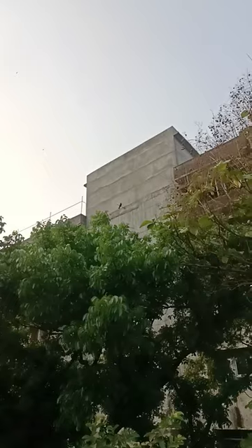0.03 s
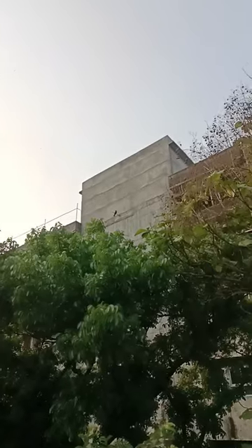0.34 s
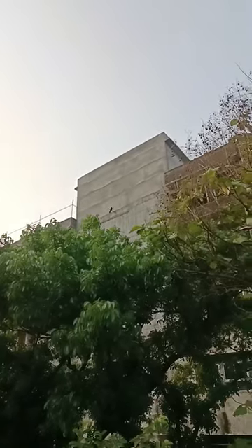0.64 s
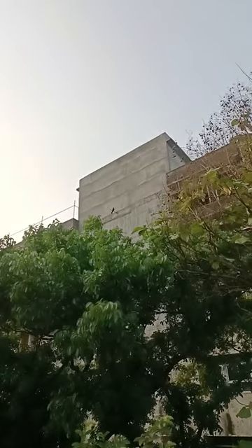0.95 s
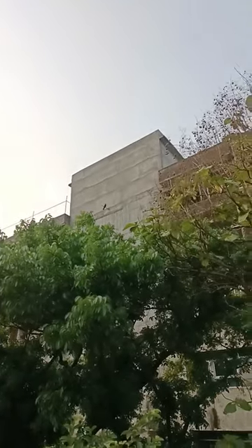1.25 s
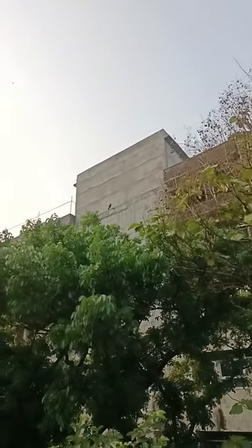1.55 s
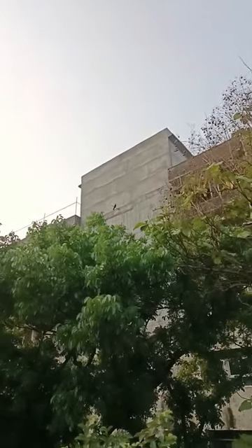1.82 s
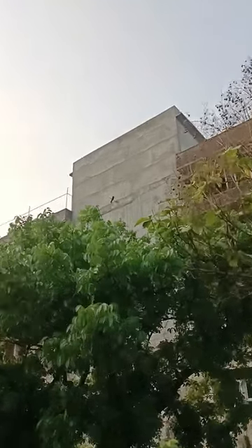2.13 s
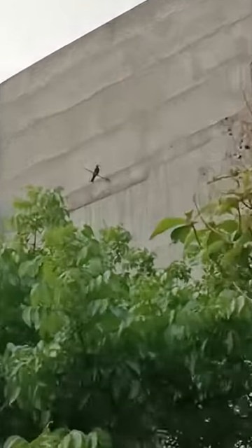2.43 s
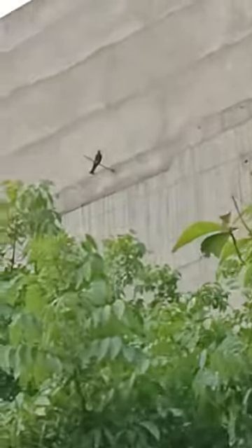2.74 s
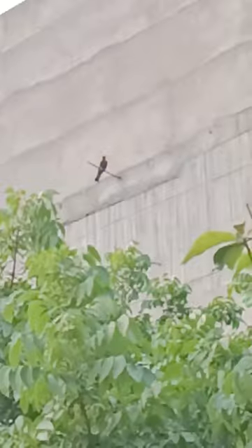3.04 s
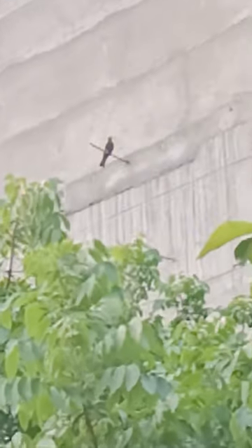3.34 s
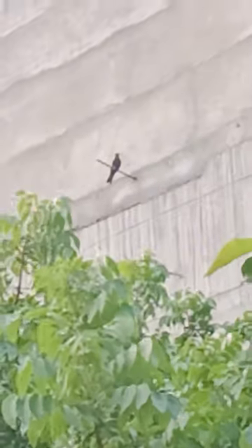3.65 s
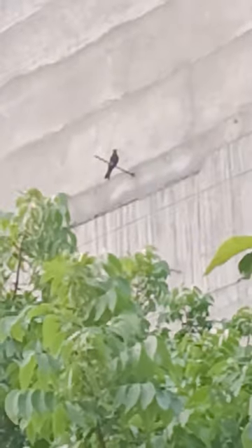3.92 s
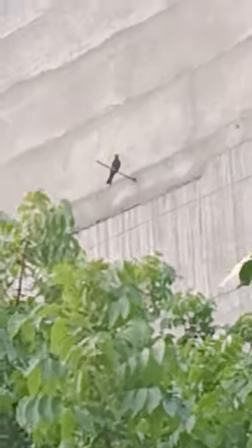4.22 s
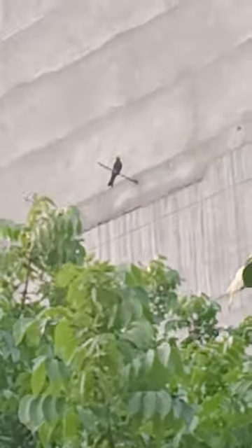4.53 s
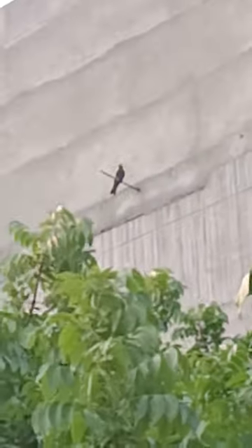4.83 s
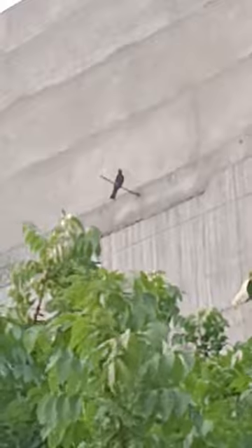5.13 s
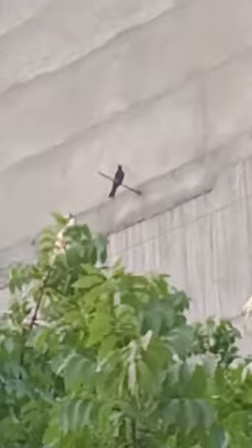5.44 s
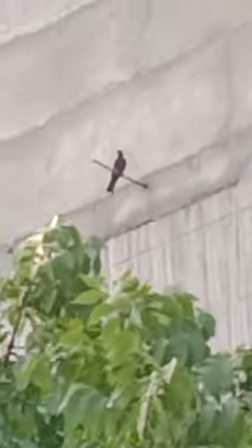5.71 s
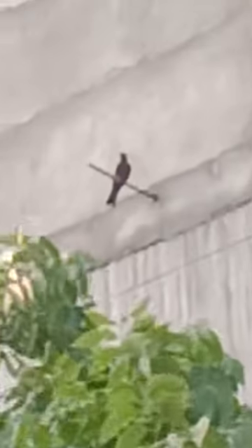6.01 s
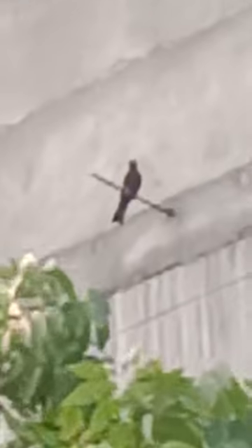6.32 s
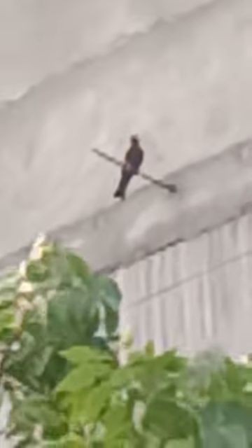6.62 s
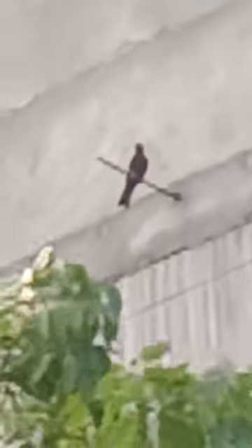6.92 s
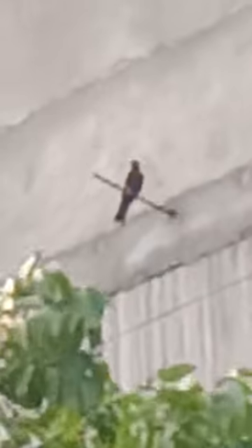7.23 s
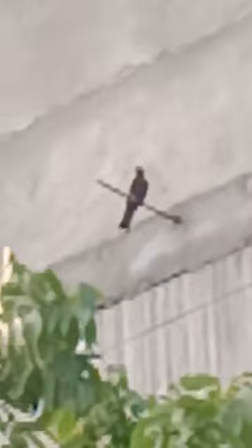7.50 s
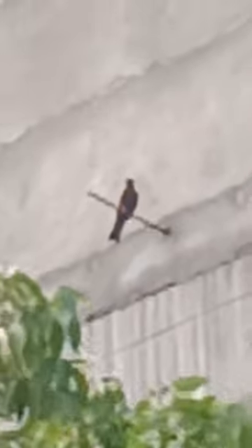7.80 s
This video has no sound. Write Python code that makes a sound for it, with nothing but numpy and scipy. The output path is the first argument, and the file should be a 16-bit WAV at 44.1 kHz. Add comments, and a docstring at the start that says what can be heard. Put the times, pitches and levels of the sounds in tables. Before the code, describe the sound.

A large bird calls loudly three times, each call a short squeal that leaps to a falling whistle and breaks into rough quavers. A small bird twitters between the first two calls, and from halfway another repeats quick down-slurred chirps. Fainter birds whistle farther off. The near birds are mainly on the left, with light reverberation from walls, over distant traffic and a soft hiss.

```python
"""A kite calls three times among buildings and trees, its syrinx jumping between registers: a short squeal
leaps to a falling whistle, which drops into quavers that roughen under strain. A warbler repeats steep
down-slurred chirps, a small bird twitters, and others whistle farther off, all frequency-modulated tones.
Foliage scatters the calls and walls reverberate, over distant traffic, a machinery hum and a soft hiss.
The near birds are heard mainly on the left."""
import sys
import numpy as np
from scipy import signal
from scipy.fft import rfft, irfft, next_fast_len
from scipy.io import wavfile
from scipy.ndimage import map_coordinates

SR = 44100
rng = np.random.default_rng(int(sys.argv[2]) if len(sys.argv) > 2 else 0)


def persist_wave(psi):
    """Save psi, clipped to +-1, as 16-bit WAV."""
    counts = np.round(np.clip(psi, -1, 1) * 32767).astype(np.int16)
    wavfile.write(sys.argv[1], SR, np.atleast_2d(counts).T)


N = 355446
TIME = np.arange(N) / SR

# The warbler's three pitch contours. Each row: time into the chirp in seconds, pitch in Hz.
SHELF = [(0, 7347), (.009, 5820), (.017, 4910), (.039, 4730), (.066, 4634), (.108, 3480), (.127, 4514),
         (0.149, 4069)]
STEP = [(0, 7187), (.013, 5963), (.032, 5604), (.043, 4165), (.056, 3739), (.098, 3400), (.123, 3918),
        (0.147, 3909)]
PLUNGE = [(0, 7440), (.011, 4950), (0.018, 4250), (.04, 3870), (0.061, 3650), (.078, 4000), (.108, 3450)]


def kite(crack_s=2.378, crack_db=-19):
    """Register breaks: each call jumps from squeal to whistle to quavers."""
    # Each row: start in seconds, top pitch in Hz, swell time in seconds, level and octave level in dB.
    squeals = [(.947, 2512, 0.0111, -18.5, -12.5), (3.352, 2705, 0.01654, -11.5, -8.5),
               (5.823, 2648, 0.0309, -15, -7)]
    # Each row: start in seconds, first pitch in Hz, settling time in seconds, final droop in Hz,
    # level in dB, fade in dB per second, relative levels of the octave and the low register in dB.
    whistles = [(1.066, 3046, 0.088, 34.8, -22, 14, -22, -9),
                (3.386, 3223, 0.1533, 152.5, -19.5, 7.5, -13.5, -10.5),
                (5.858, 3244, 0.17, 175, -19, 12.5, -24.5, -14.5)]
    # Each row: start, end, first crest, first gap between crests and growth of each gap, all in seconds.
    quaver_times = [(1.463, 2.53, 1.531, .0696, .0006), (3.723, 4.632, 3.777, .067, .0015),
                    (6.308, 7.195, 6.366, .065, .00136)]
    # Each row: first and held pitch in Hz, then level, gain over the run, octave and harshness in dB.
    quaver_voices = [(2195, 2290, -28, 1.3, -7, -1), (2130, 2285, -25, .3, -8.5, 0),
                     (2100, 2215, -27, -1.8, -5.5, -3)]
    # The voice cracks once between two quavers. Each row: time into the note in seconds, pitch in Hz.
    crack = [(0, 2713), (.014, 1987)]
    out = np.zeros(N)
    for (start, *rise), (jump, *fall), timing, voice in zip(squeals, whistles, quaver_times, quaver_voices):
        drop = timing[0]
        add(out, start, squeal(jump - start, *rise))
        add(out, jump, whistle(drop - jump, *fall))
        add(out, drop, quavers(*timing, *voice))
    add(out, crack_s, note(crack, crack_db, attack_s=.002, fade_db=12, jitter=.04, octave_db=-29))
    return out


def squeal(length, top_hz, swell_s, db, octave_db, first_hz=2292, rise_s=.03006, sag_hz_per_s=810):
    """Glide in the middle register: the tone swells and climbs, then sags and slackens until it jumps."""
    t = TIME[:int((length + .003) * SR)]
    hz = first_hz + (top_hz - first_hz) * ramp(t, rise_s) - sag_hz_per_s * np.maximum(t - rise_s, 0)
    onset_db = -12 * (1 - ramp(t, swell_s))
    release_db = -7 * (1 - ramp(t[-1] - t, .018))
    return held_note(hz, db + onset_db + release_db, octave_db, jitter=.0069, low_db=-24.5, third_db=-18)


def whistle(length, first_hz, settle_s, droop_hz, db, fade_db_per_s, octave_db, low_db):
    """Relaxation in the top register: pitch, level and brightness all sink as the push eases."""
    rest_hz, droop_s, octave_fade_db_per_s = 2891.4, .08, 10
    t = TIME[:int((length + .003) * SR)]
    settling_hz = rest_hz + (first_hz - rest_hz) * np.exp(-t / settle_s)
    hz = settling_hz - droop_hz * (1 - ramp(length - t, droop_s) ** 2)
    return held_note(hz, db - fade_db_per_s * t, octave_db - octave_fade_db_per_s * t,
                     jitter=.00756, low_db=low_db, third_db=-22.5)


def held_note(hz, db, octave_db, jitter, low_db, third_db, low_hz=2490, low_fade_db_per_s=30):
    """Nonlinear mixing: the fading low register flutters with the held note, making combination tones."""
    n = len(hz)
    hz = hz * (1 + jitter * wobble(353.5, n) + .003 * wobble(24.23, n))
    overtones = (tone(2 * hz) + amp(third_db) * tone(3 * hz)) * amp(.97 * wobble(58.6, n))
    under_hz = low_hz * (1 + .048 * wobble(400, n))
    mixing = amp(-9.5) * tone(2 * hz - under_hz) + amp(-11.5) * tone(hz + under_hz)
    low = tone(under_hz) + amp(-13) * tone(2 * under_hz) + mixing
    flutter = amp(low_db - low_fade_db_per_s * TIME[:n] + 3.5 * wobble(45, n))
    return amp(db + 1.47 * wobble(63.33, n)) * (tone(hz) + flutter * low + amp(octave_db) * overtones)


def quavers(start, end, crest_s, gap_s, growth_s, first_hz, held_hz, db, push_db, octave_db, harsh_db,
            swing_hz=190, early_dip_db=1, added_dip_db=34, second_hz=2960):
    """Modulation near 14 Hz, ever slower: the pitch arches and the troughs deepen until notes separate."""
    t = np.arange(start, end, 1 / SR)
    n, progress = len(t), (t - start) / (end - start)
    k = np.arange(-2, 17)
    crests = crest_s + k * gap_s + k * (k - 1) / 2 * growth_s
    trough = np.sin(np.pi * np.interp(t, crests, k)) ** 2
    strain = np.clip(2 * progress, 0, 1)
    jitter = .00557 + .00983 * strain * amp(harsh_db)
    hz = (first_hz + (held_hz - first_hz) * strain - swing_hz * trough) * (1 + jitter * wobble(900, n))
    effort = amp(db + push_db * progress + 1.53 * wobble(119.38, n))
    voiced = amp(-(early_dip_db + added_dip_db * progress ** 1.2) * trough ** 2)
    harmonics = sum(amp(level + 1.6 * wobble(70, n)) * tone(order * hz)
                    for order, level in enumerate([0, octave_db, octave_db - 13, octave_db - 34], 1))
    # Biphonation: the other side of the syrinx sounds too, unsteadily, and mixes with the first.
    other_hz = second_hz * (1 + .022 * wobble(500, n))
    mixing = (amp(-9.5) * tone(other_hz + hz) + amp(-12.5) * tone(2 * other_hz - hz)
              + amp(-36) * tone(other_hz + 2 * hz))
    other_db = -9 + harsh_db - 7.4 * (1 - strain) + 4.69 * wobble(59.43, n)
    other_side = amp(other_db) * (tone(other_hz) + mixing)
    # Under strain the membrane also flaps chaotically, and its pitch darts about.
    wild_hz = 2350 * np.exp(.14 * wobble(110, n) + .08 * wobble(1200, n))
    rasp = (tone(wild_hz) + amp(-16.5) * tone(2 * wild_hz)) * unit(amp(2.6 * wobble(150, n)))
    roughness = amp(-12 + harsh_db) * (.377 + 1.078 * strain)
    # Each strained crest hisses. Each row: frequency in Hz, relative spectral density in dB.
    hiss_spectrum = [(800, -17.5), (1500, -7), (4500, -10.5), (8000, -3), (14000, -27.5)]
    hiss = amp(-24 + harsh_db) * strain * noise(hiss_spectrum, n)
    return effort * (voiced * (harmonics + other_side + hiss) + roughness * rasp)


def warbler():
    """Frequency sweeps: three down-slurred shapes take turns, nearly three chirps a second."""
    # Each row: start in seconds, level in dB, pitch contour.
    chirps = [(4.116, -31, STEP), (4.488, -26.5, PLUNGE), (4.826, -26, SHELF), (5.197, -28, STEP),
              (5.561, -26.5, PLUNGE), (5.92, -26.5, SHELF), (6.331, -26.5, PLUNGE), (6.676, -25, STEP),
              (7.07, -24.5, PLUNGE), (7.393, -27, SHELF), (7.742, -27.5, STEP)]
    out = np.zeros(N)
    for start, db, shape in chirps:
        add(out, start, note(shape, db, attack_s=.00976, fade_db=11.5, jitter=.0081, octave_db=-35.5))
    return out


def twitterer(lead_s=.025):
    """Rapid sweeps: thin tsips, later two squeaks and sharp flicks, each flick led in by two soft tones."""
    # The pitch contours, two of them in the lead-in. Each row: time into the note in seconds, pitch in Hz.
    tsip = [(0, 5378), (.012, 5400), (.022, 4950), (.031, 4496)]
    squeak = [(0, 3927), (.017, 4650), (.02, 5990), (.033, 5850), (.039, 3910), (.046, 2373)]
    flick = [(0, 7357), (.006, 5372), (.012, 3900), (.02, 2617)]
    lead_in = [
        [(0, 4320), (.022, 4450)],
        [(0, 5230), (.022, 5560)],
    ]
    # Each row: start in seconds, level in dB and, for a flick, the level of its lead-in in dB.
    tsips = [(.078, -34), (.15, -24.5), (0.257, -28.5), (.4, -33)]
    squeaks = [(2.45, -16), (2.51, -19.5)]
    flicks = [(2.486, -23, -34.5), (2.618, -27.5, -36.5), (2.695, -25.5, -41.5), (2.785, -26.5, -29),
              (2.864, -26.5, -34), (2.944, -29.5, -42.5), (3.038, -36, -52.5)]
    out = np.zeros(N)
    for start, db in tsips:
        add(out, start, note(tsip, db, attack_s=.0156, fade_db=5.5, jitter=.035, octave_db=-37))
    for start, db in squeaks:
        add(out, start, note(squeak, db, attack_s=.0159, fade_db=14, jitter=.02266, octave_db=-31))
    for start, db, lead_db in flicks:
        add(out, start, note(flick, db, attack_s=.00454, fade_db=9, jitter=.05166, octave_db=-28))
        for voice in lead_in:
            lead = note(voice, lead_db, attack_s=.0036, fade_db=5, jitter=.0082, octave_db=-34.5)
            add(out, start - lead_s, lead)
    return out


def note(shape, db, attack_s, fade_db, jitter, octave_db):
    """Jitter and shimmer: a slurred note swells and fades, its pitch and level never twice alike."""
    hz, = trace(shape)
    n = len(hz)
    hz = hz * (1 + jitter * wobble(294.3, n))
    level = ramp(TIME[:n], attack_s) * amp(db - fade_db * np.linspace(0, 1, n) + 2.22 * wobble(90.1, n))
    return level * (tone(hz) + amp(octave_db) * tone(2 * hz))


def far_birds():
    """Pure-tone glides: slurs from both sides, and two long low whistles from the trees on the left."""
    # Each row: start and length in seconds, first and last pitch in Hz, level and left over right in dB.
    slurs = [(0.472, 0.0714, 8276, 7904, -50, 20.5), (0.522, 0.0924, 2430, 2528, -45, 12),
             (0.544, 0.073, 3310, 3699, -46.5, 17), (2.528, 0.141, 1918, 1898, -45, -20),
             (2.897, 0.18, 2948, 2289, -42.5, 8), (2.965, 0.3, 7976, 8060, -59.5, 15.5),
             (3.046, 0.1536, 3234, 2244, -45, -21.5), (3.262, 0.07, 7143, 7046, -50, 18.5),
             (5.424, 0.1547, 2520, 2503, -34.5, 22), (5.458, 0.066, 8116, 7930, -57, 11.5),
             (7.339, 0.061, 4150, 5450, -51.5, 14.5), (7.661, 0.1428, 1879, 1924, -47, -16),
             (7.822, 0.078, 8904, 8474, -53, 27), (7.868, 0.11, 3953, 2474, -49, 1)]
    # One list for each whistle. Each row: time in seconds, pitch in Hz, level in dB.
    low_whistles = [
        [(.29, 1675, -50), (.36, 1894, -44.5), (.47, 1949, -39.5), (.53, 1933, -51), (.78, 1955, -37)],
        [(5.13, 2156, -42), (5.22, 2000, -38), (5.35, 2079, -36.5), (5.42, 2101, -75.5)],
    ]
    out = np.zeros((2, N))
    for start, length, start_hz, end_hz, db, left_db in slurs:
        n = int(length * SR)
        hz = np.linspace(start_hz, end_hz, n) * (1 + .01107 * wobble(200, n))
        add(out, start, pan(left_db) * amp(db) * signal.windows.tukey(n, .6) * tone(hz))
    for rows in low_whistles:
        hz, db = trace(rows)
        add(out, rows[0][0], pan(23.9) * amp(db) * tone(hz * (1 + .0065 * wobble(88, len(hz)))))
    return out


def chorus(count=90, level_db=-53, spread_db=10):
    """Attenuation with frequency: of many faint birds slurring at random, the high ones carry least."""
    out = np.zeros((2, N))
    for when, height, span, slur, loud in rng.random((count, 5)):
        n = int(SR * .061 * (1 + span))
        start_hz = 2500 * 2.8 ** height
        glide = np.linspace(0, .6 * (slur - .5) * (1 - height), n)
        hz = start_hz * np.exp(glide + .015 * wobble(200, n))
        db = level_db - 7 * height + spread_db * loud
        add(out, when * N / SR, pan(20 * loud) * amp(db) * np.hanning(n) * tone(hz))
    return out


def yard(x, scatter_db, tail_db, tail_t60_s=1.0, scatter_t60_s=.12):
    """Scattering and reverberation: ledges and leaves answer at once, and the walls ring on."""
    t = TIME[:SR]
    # The reverberation sounds nearly alike in the left and right channels.
    diffuse = rng.standard_normal(SR) + .5 * rng.standard_normal((2, SR))
    tail = diffuse * amp(-60 * t / tail_t60_s) * (1 - np.exp(-t / .0128))
    scatter = rng.standard_normal(SR) * (rng.random(SR) < .02) * amp(-60 * t / scatter_t60_s)
    response = (amp(scatter_db) * unit(scatter) + amp(tail_db) * unit(tail)) / np.sqrt(SR)
    return x + signal.fftconvolve(x, response, axes=1)[:, :N]


def traffic(db=-46.5):
    """A diffuse field: distant traffic arrives from everywhere, its lows most alike left and right."""
    # Each row: frequency in Hz, relative spectral density in dB.
    spectrum = [(25, -21.5), (85, -14.5), (135, -3.5), (400, -4.5), (1100, -9.5), (2000, -3), (5500, -15.5),
                (9000, -27), (15000, -39)]
    # Each row: frequency in Hz, correlation between left and right.
    coherence = [(100, 1), (350, 0.902), (1200, 0.693)]

    def mid_side_gains(hz):
        angle = np.arccos(np.clip(along(coherence, hz), -1, 1)) / 2
        return np.array([np.cos(angle), np.sin(angle)])

    mid, side = filtered(np.array([noise(spectrum, N), noise(spectrum, N)]), mid_side_gains)
    return amp(db + wobble(11, N)) * np.array([mid + side, mid - side])


def tree_hiss(db=-50):
    """Incoherent summation: leaves and far birds merge into a soft hiss, mainly on the left."""
    # Each row: frequency in Hz, relative spectral density in dB.
    spectrum = [(700, -28.5), (1700, -6), (3800, -7.5), (5800, -20.5), (7500, -16.5), (10000, -19.5),
                (15000, -23.5)]
    return pan(32) * amp(db) * np.array([noise(spectrum, N), noise(spectrum, N)])


def machinery(gain_db=-2):
    """A line spectrum: far machinery hums in two slowly wavering tones."""
    # Each row: frequency in Hz, level in dB before the gain.
    partials = [(64.6, -68.5), (489.9, -64.5)]
    return sum(amp(db + gain_db + 1.1 * wobble(6.6, N)) * tone(hz * (1 + .007756 * wobble(8.2, N)))
               for hz, db in partials)


def amp(db):
    """Decibels to gain."""
    return 10 ** (np.asarray(db) / 20)


def unit(x):
    """Scale to rms 1."""
    return x / np.sqrt(np.mean(x ** 2) + 1e-20)


def ramp(t, length):
    """A linear rise from 0 to 1 over a length of time."""
    return np.clip(t / length, 0, 1)


def along(points, hz):
    """Interpolate (Hz, value) points on a logarithmic frequency axis."""
    knots_hz, values = np.transpose(points)
    return np.interp(np.log(hz + 1), np.log(knots_hz + 1), values)


def wobble(rate, size):
    """A smooth random curve, rate knots a second."""
    return map_coordinates(rng.standard_normal(int(size * rate / SR) + 4), [np.arange(size) * rate / SR])


def filtered(x, response):
    """Multiply the spectrum of x by a frequency response."""
    size = next_fast_len(x.shape[-1] + 8192)
    return irfft(rfft(x, size) * response(np.fft.rfftfreq(size, 1 / SR)), size)[..., :x.shape[-1]]


def noise(spectrum, size):
    """Coloured noise of rms 1."""
    return unit(filtered(rng.standard_normal(size), lambda hz: amp(along(spectrum, hz))))


def trace(rows):
    """Interpolate each column after the time, sample by sample, holding the last value for 3 ms."""
    times, *columns = np.transpose(rows)
    t = np.arange(times[0], max(times[-1], times[0] + .01) + .003, 1 / SR)
    return [np.interp(t, times, column) for column in columns]


def tone(hz):
    """A sine of rms 1 whose phase is the integral of a pitch curve."""
    return np.sqrt(2) * np.sin(2 * np.pi * np.cumsum(hz) / SR)


def add(track, start_s, x):
    """Mix a note into the track with tapered ends."""
    i = max(round(start_s * SR), 0)
    x = x * signal.windows.tukey(x.shape[-1], min(1, 280 / x.shape[-1]))
    track[..., i:i + x.shape[-1]] += x[..., :N - i]


def pan(left_db):
    """A level difference: left and right gains whose mean is 1."""
    return 2 * np.array([[amp(left_db)], [1]]) / (1 + amp(left_db))


def scene():
    """Superposition: each bird sounds in the yard from its own place, over the steady background."""
    out = yard(pan(18.8) * kite(), scatter_db=-11, tail_db=-12.5)
    out += yard(pan(20.75) * warbler(), scatter_db=2, tail_db=-5.5)
    out += yard(pan(21) * twitterer(), scatter_db=-3.5, tail_db=-11)
    out += yard(far_birds() + chorus(), scatter_db=3, tail_db=0)
    return out + traffic() + tree_hiss() + machinery()


def record(dry, open_s=.0998, top_hz=15600):
    """Band limiting: the microphone opens after a moment and passes nothing above its top frequency."""
    return filtered(dry * (TIME >= open_s), lambda hz: hz < top_hz)


dry = scene()
out = record(dry)
persist_wave(out)
```